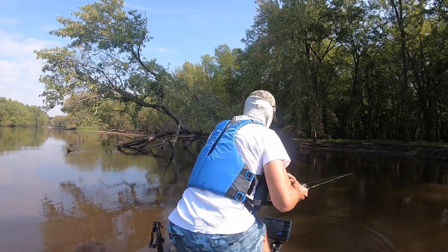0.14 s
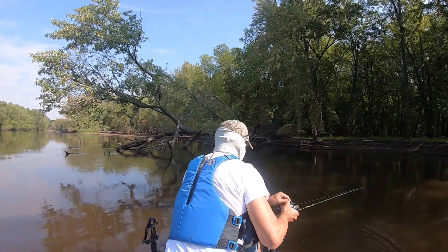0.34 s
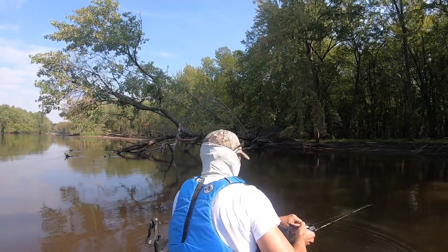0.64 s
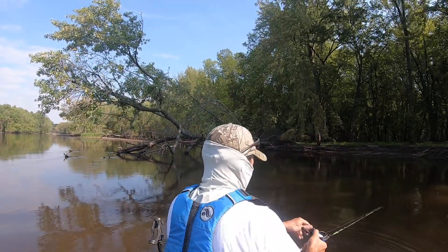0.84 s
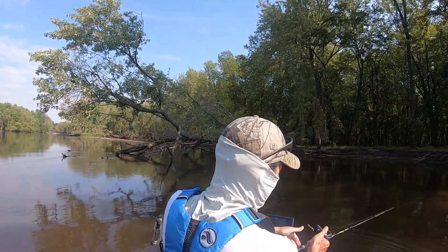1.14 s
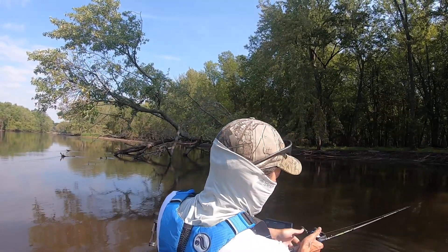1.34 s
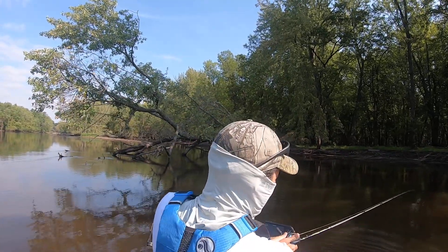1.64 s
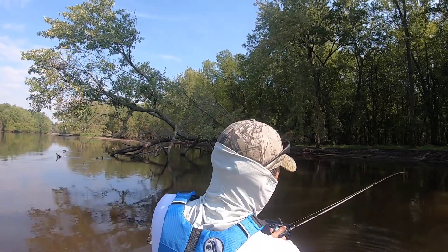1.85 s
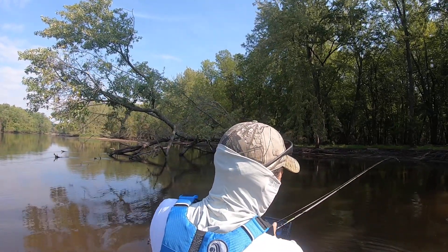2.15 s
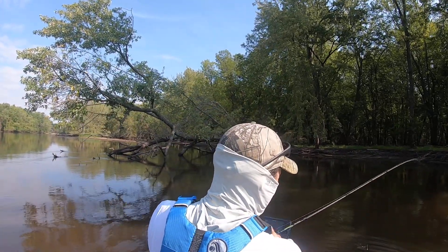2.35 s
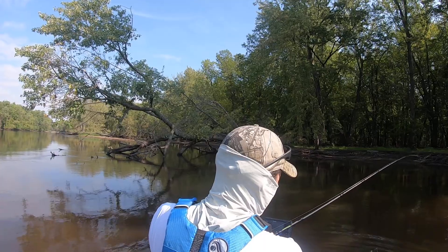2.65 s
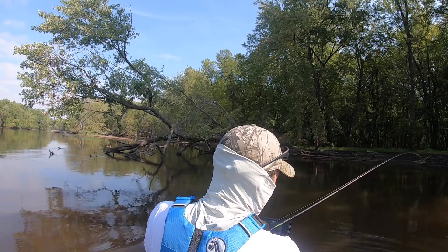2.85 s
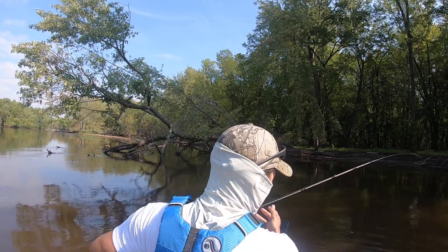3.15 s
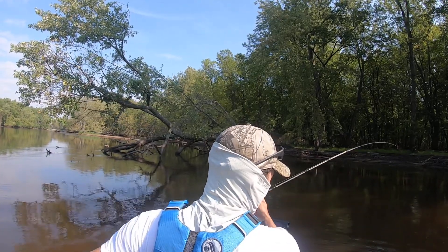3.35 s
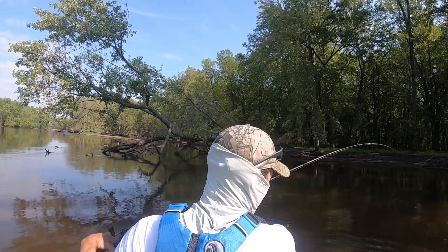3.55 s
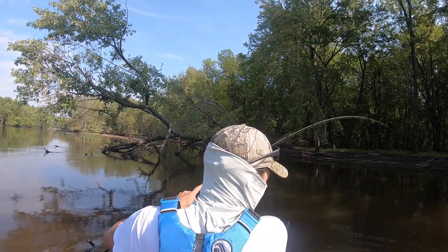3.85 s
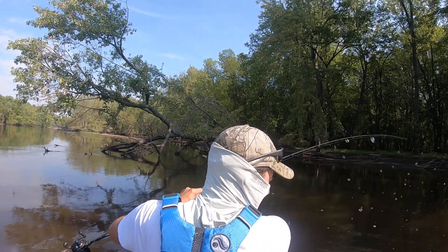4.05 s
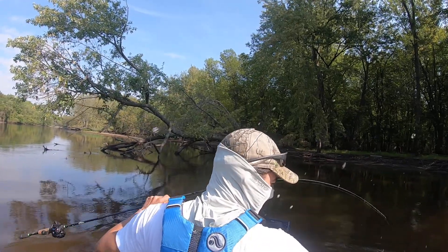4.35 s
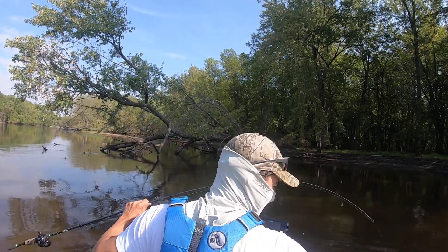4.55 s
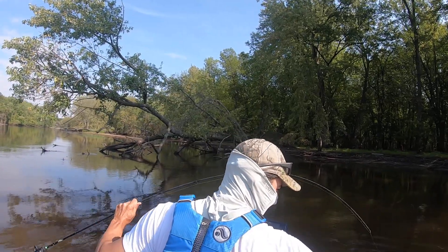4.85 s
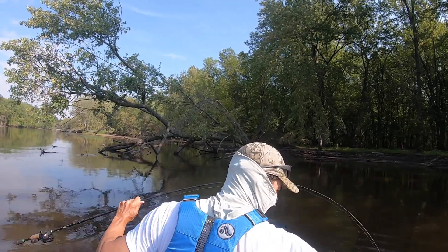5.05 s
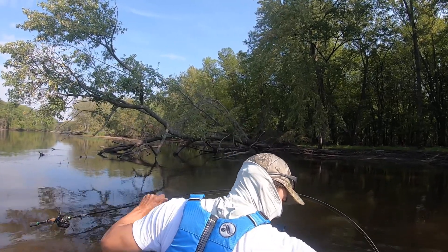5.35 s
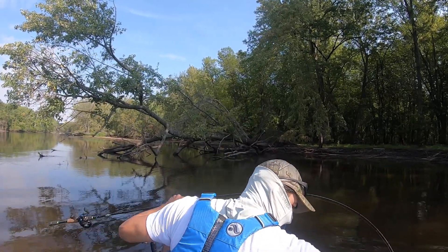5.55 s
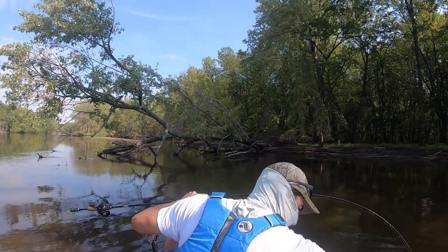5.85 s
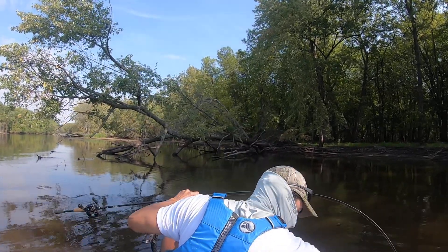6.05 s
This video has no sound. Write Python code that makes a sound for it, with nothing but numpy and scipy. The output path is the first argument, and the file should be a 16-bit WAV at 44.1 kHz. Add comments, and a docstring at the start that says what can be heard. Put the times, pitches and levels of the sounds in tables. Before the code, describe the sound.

Close, boat-mounted sound on a quiet river, with soft air and a faint steady band of insects. From 0 to 0.4 s clothing rustles and crackles with small dry clicks. From about 0.45 to 1.2 s the angler drops into the seat: crowded hollow knocks, low booms and plastic clacks, with rumbling hull and stretching mesh. More knocks come near 1.35 and a strong short one at 1.5 s. The stereo narrows; from 1.7 to 2.9 s line sings thin, high, fluttering, gliding notes, with weak bumps near 2.1 and 2.6 s. Sleeves swish around 3.3 s. At 3.6 to 4.1 s bright metal clinks and sharp clicks, loudest at 3.93 s, join the first watery plops. A fish slaps and thrashes until about 5.3 s, moving right, with gurgles, spray and drips. Foam hiss fades; soft thumps at 5.8 and 6 s end it.

```python
"""An angler and a hooked fish

An angler drops into the seat of a plastic kayak on a calm river: clothes rustle, the hull booms and knocks.
Blows ring decaying tones in the hull, and filtered random clicks make the cloth. Line sings off the reel in
fluttering notes, metal tackle clinks in close pairs of tones, and a fish slaps and thrashes on the right as
ringing air pockets and spray. Noise makes the air and insects; the stereo nearly closes in the quiet middle."""
import sys
import numpy as np
from scipy import signal
from scipy.fft import rfft, irfft
from scipy.io import wavfile
from scipy.ndimage import uniform_filter1d, map_coordinates

SR = 44100
rng = np.random.default_rng(int(sys.argv[2]) if len(sys.argv) > 2 else 0)


def to_wav(s):
    """Save 16-bit WAV."""
    ch = np.atleast_2d(s).T  # columns
    pcm = np.round(np.clip(ch, -1, 1) * 32767)  # PCM
    wavfile.write(sys.argv[1], SR, pcm.astype(np.int16))


N = 273420
TIME = np.arange(N) / SR
AGE = np.arange(SR // 2) / SR  # time since a blow, s

# soft, hollow thumps of body and water against the hull:
# t/s, boom level/dB, starting pitch f/Hz, time to fade by 60 dB/s, thud level relative to the boom/dB
THUMP_EVENTS = [(0.15, -29, 100, 0.71, 4), (0.208, -23, 214, 0.074, -1), (0.257, -32, 205, 0.19, 6),
                (0.453, -19, 149, 0.044, 2), (.613, -20, 727, 0.056, -18), (0.772, -20, 196, 0.12, -4),
                (0.812, -11, 172, 0.059, -27), (0.845, -14, 191, 0.107, -15),
                (0.961, -16, 142, 0.073, -15.5), (0.978, -13, 205, 0.092, -4.5),
                (1.335, -29, 260, 0.11, -13.5), (1.510, -9.5, 533, 0.041, -10.5),
                (1.515, -9, 100, 0.045, -11.5), (1.586, -28, 470, 0.087, -7),
                (2.082, -19.5, 197.7, 0.11, -9), (2.563, -32, 74, 0.12, -3),
                (3.004, -34.5, 177, 0.088, -6.5), (3.204, -30, 90, 0.13, -5), (3.313, -33.5, 115, 0.13, 7),
                (3.314, -39, 490, 0.059, 5), (3.458, -29, 275, 0.041, -18), (3.463, -37, 106, 0.12, -2),
                (3.521, -36, 77.8, 0.41, -3), (4.167, -33, 270, 0.034, 10), (4.22, -24.5, 181.8, 0.31, 2),
                (4.289, -29.5, 163.5, 0.26, 1), (4.452, -36.5, 133.7, 0.28, 9),
                (4.547, -34.5, 70, 0.23, -5), (4.88, -39.5, 68, 0.34, 6), (5.776, -26, 190, 0.06, -29),
                (5.798, -30.5, 101.2, 0.4, -28)]
# sheets of water thrown by the tail:
# t/s, relative spray level/dB, relative churning level/dB, length/s, relative falling water level/dB, flight/s
WATER_SHEETS = [(3.602, -42.5, -73, 0.075, -42, 0.14), (3.716, -38, -29, 0.043, -43, 0.071),
                (3.921, -62, -29.5, 0.021, -48.5, 0.12), (4.146, -33.5, -53, 0.075, -46, 0.21),
                (4.311, -44.5, -40.5, 0.071, -67, 0.072), (4.548, -43, -46, 0.14, -45, 0.14),
                (4.702, -40, -33, 0.071, -38.5, 0.13), (4.798, -39.5, -32.5, 0.088, -41, 0.17),
                (5.02, -41.5, -56, 0.076, -61, 0.052), (5.141, -38.5, -69, 0.052, -69, 0.059)]
# strokes of sleeves and life vest:
# t at the fastest/s, relative swish level/dB, relative crackle level/dB, rise by 20 dB/s, fall by 20 dB/s
CLOTH_STROKES = [(0.016, -65, -46, 0.062, 0.13), (0.163, -48.5, -47, 0.086, 0.15),
                 (.33, -43, -49, 0.14, 0.078), (.465, -45, -58, 0.11, 0.047), (.6, -41, -46.5, 0.24, 0.14),
                 (.76, -48.5, -56.5, 0.11, 0.33), (.87, -46, -78, 0.29, 0.31), (1.42, -60.5, -74, 1, 0.33),
                 (1.735, -49.5, -63, 0.46, 0.14), (2.0, -64, -103, 0.73, 1), (3.15, -60, -92, 0.41, 0.61),
                 (3.335, -48, -61, 0.19, 0.28)]


def gain_of(db):
    """Decibels to amplitude."""
    return 10 ** (np.asarray(db) / 20)


def evened(x):
    """Scales to an rms of 1."""
    return x / np.sqrt(np.mean(x ** 2) + 1e-20)


def peaked(x):
    """Scales to a peak of 1."""
    return x / (abs(x).max() + 1e-20)


def read(points, hz):
    """Reads a spectrum on a log-frequency axis."""
    f, value = np.transpose(points)
    return np.interp(np.log(hz + 1), np.log(f + 1), value)


def levels(rows):
    """One gain curve for each dB column, practically silent outside the rows."""
    s, *columns = np.transpose(rows)
    return [gain_of(np.interp(TIME, s, c, left=-120, right=-120)) for c in columns]


def add(mix, s, sound):
    """Mixes a sound in at its time."""
    part = mix[..., max(round(s * SR), 0):][..., :sound.shape[-1]]
    part += sound[..., :part.shape[-1]]


def colour(x, points):
    """Filters by a spectrum."""
    hz = np.fft.rfftfreq(x.shape[-1], 1 / SR)
    return irfft(rfft(x) * gain_of(read(points, hz)), x.shape[-1])


def band(x, hz, q):
    """A broad resonance that rings only after its input."""
    hz = min(hz, SR / 3)
    b, a = signal.iirpeak(hz, max(q, 3 * hz / SR), SR)
    return signal.lfilter(b, a, x)


def fade(t60):
    """A decay of 60 dB in t60 seconds, never faster than 1 ms."""
    return np.exp(-np.log(1000) * AGE / max(t60, 1e-3))


def wander(hz):
    """Slow random movement with an rms of 1."""
    smoothing = np.exp(-(np.fft.rfftfreq(N, 1 / SR) / hz) ** 2)
    return evened(irfft(rfft(rng.standard_normal(N)) * smoothing, N))


def grains(per_s, spread_db):
    """A random train of clicks of either sign; a spread other than 0 makes their sizes uneven."""
    present = rng.random(N) < per_s / SR
    sign = rng.choice([-1, 1], N)
    return present * sign * gain_of(spread_db * np.minimum(rng.exponential(1, N), 4))


def place(x, pan_db, lag_s_per_db=.000012):
    """The far ear hears a sound softer and later; pan_db is left minus right."""
    sides = gain_of([[pan_db / 2], [-pan_db / 2]])
    left = np.roll(x, round(-pan_db * lag_s_per_db * SR))  # earlier when the left is the near ear
    return np.array([left, x]) * sides / sides.mean()


def stroke(s, db, rise_s, fall_s):
    """A movement's gain: climbs 20 dB in rise_s to its peak, then drops 20 dB in fall_s."""
    before = (s - TIME) / max(rise_s, .005)
    after = (TIME - s) / max(fall_s, .005)
    return gain_of(db - 20 * np.minimum(np.maximum(before, after), 10))


def together(gains):
    """Unrelated sounds add in power."""
    return np.sqrt(sum(g ** 2 for g in gains))


def burst(t60, onset_s):
    """A gritty contact: noise that swells and dies."""
    return rng.standard_normal(len(AGE)) * fade(t60) * (1 - np.exp(-AGE / onset_s))


def snap(hz, t60, q, onset_s):
    """A short crack: a noise burst through two broad resonances at one pitch."""
    once = band(burst(t60, onset_s), hz, q)
    return peaked(band(once, hz, q / 2))


def bubble(hz, t60, rise, onset_s=0.00043):
    """A fading ring, as of an air pocket, whose pitch glides by rise octaves within t60."""
    pitch = hz * 2 ** (rise * np.minimum(AGE / max(t60, 1e-3), 1))
    ring = np.sin(2 * np.pi * np.cumsum(pitch) / SR)
    return peaked(ring * fade(t60) * (1 - np.exp(-AGE / onset_s)))


def patchy(x, depth_db):
    """Random patches of level, about 15 ms by 1 kHz."""
    z = signal.stft(x, nperseg=256)[2]
    field = uniform_filter1d(rng.standard_normal(z.shape[-2:]), size=6, axis=0)
    field = evened(uniform_filter1d(field, size=5, axis=1))
    return signal.istft(z * gain_of(depth_db * field), nperseg=256)[1][..., :N]


def twisted(x, side_db, turn_rad):
    """Vibration through the mount shakes the two microphones out of step."""
    side = gain_of(side_db) * (signal.hilbert(x) * np.exp(1j * turn_rad)).real
    return np.array([x - side, x + side])


def knocks(level_db=-2, boom_db=5, clack_db=7, tick_db=6, clunk_db=-2, slide_db=-6,
           scuff=0.099, sway=0.84, lead_s=0.001987):
    """Each blow scuffs briefly and rings the hull; heavy blows favour the low modes, hard ones the high."""
    # blows on seat and hull: t/s, then relative levels of body/dB, boom/dB, clack/dB, tick/dB,
    # and time for the scuff to fade by 60 dB/s
    blows = [(0.452, -36, -22.5, -68, -42, 0.0064), (0.557, -28, -34, -37, -43, 0.029),
             (0.600, -21, -36, -52, -46, 0.051), (0.610, -17, -18, -21, -25, 0.046),
             (0.626, -24, -20, -27.5, -46, 0.075), (0.697, -25.5, -23, -30.5, -37.5, 0.1),
             (0.721, -19.5, -21.5, -27.5, -45, 0.056), (0.803, -25, -24, -34, -49, 0.061),
             (0.825, -39, -30, -33.5, -50, 0.024), (0.841, -20, -21.5, -37, -40, 0.05),
             (0.875, -14.5, -22, -32, -40, 0.052), (0.904, -20, -36, -50, -55, 0.054),
             (0.948, -27, -37, -56, -60, 0.04), (0.991, -24, -48, -28.5, -36.5, 0.047),
             (1.037, -19, -23, -18.5, -32, 0.05), (1.146, -18.5, -35, -35, -55, 0.034),
             (1.154, -12.5, -24.5, -19.5, -27, 0.068), (1.173, -29.5, -41, -35, -57, 0.059),
             (1.351, -23, -31.5, -30, -40, 0.048), (1.381, -36, -34, -55, -56, 0.025),
             (1.410, -36, -27.5, -54.5, -62, 0.082), (1.481, -33, -18.5, -63, -60, 0.17),
             (1.511, -14.5, -38, -27.5, -46, 0.06), (1.521, -51.5, -23, -29.5, -58, 0.059),
             (1.994, -33.5, -78, -75, -72, 0.076), (2.081, -51, -56, -59, -67, 0.019),
             (2.556, -39, -38.5, -65, -57, 0.056), (3.309, -33.5, -31, -45, -59, 0.086),
             (3.458, -38, -51, -82, -73, 0.054), (6.004, -40.5, -37.5, -53, -46, 0.07)]
    # modes of the hull: nominal f/Hz, relative level/dB, time to fade by 60 dB/s
    hull_modes = [(93.6, -7.5, 0.59), (134.3, -1, 0.076), (205, -17, 0.084), (306, -14, 0.035),
                  (446, -7.5, 0.076), (548, -7.5, 0.15), (635, -21.5, 0.047), (750, -19, 0.042),
                  (1382, -8, 0.024), (1534, -7, 0.016), (1520, -10, 0.04), (2170, -20.5, 0.012),
                  (2600, -8.5, 0.0045), (3390, -39, 0.0091)]
    out = np.zeros((2, N))
    for s, body, boom, clack, tick, scuff_t60 in blows:
        # the scuff leads the blow
        contact = np.roll(AGE == 0, round(lead_s * SR)) + scuff * burst(scuff_t60, onset_s=0.00011)
        weight = [(200, boom + boom_db), (430, body), (630, body), (1100, clack + clack_db)]  # (Hz, dB)
        for hz, db, t60 in hull_modes:
            mode = np.exp(2j * np.pi * hz * rng.uniform(0.93, 1.04) * AGE) * fade(t60)
            ring = peaked(signal.fftconvolve(contact, mode)[:len(AGE)])
            ring = gain_of(level_db + db + read(weight, hz)) * ring
            side = sway * ring.real  # the ringing twists the mount
            add(out, s, np.array([ring.imag + side, ring.imag - side]))
        clunk = snap(hz=470, t60=scuff_t60, q=2.3, onset_s=0.0021)  # loose parts
        add(out, s, gain_of(body + clunk_db) * clunk)
        add(out, s, gain_of(tick + tick_db) * snap(hz=3760, t60=0.018, q=0.99, onset_s=0.0012))
        # plastic slides before it seats: a crack played backwards, ending at the blow
        slide = snap(hz=1500, t60=0.021, q=0.88, onset_s=0.00024)[:SR // 10][::-1]
        add(out, s + lead_s - len(slide) / SR, gain_of(clack + slide_db) * slide)
    return out


def thumps(level_db=0, sag_octaves=-0.42, thud_hz=260, thud_t60=0.16):
    """The hollow hull booms together with a dull thud, sinking a little in pitch."""
    out = np.zeros(N)
    b, a = signal.butter(2, thud_hz, fs=SR)
    for s, db, hz, t60, thud_db in THUMP_EVENTS:
        thud = peaked(signal.lfilter(b, a, burst(thud_t60, onset_s=0.00011)))
        boom = bubble(hz, t60, sag_octaves, onset_s=0.0015)
        add(out, s, gain_of(db + level_db) * (boom + gain_of(thud_db) * thud))
    return twisted(out, side_db=-2, turn_rad=1.0)


def rocking(level_db=1, lumpy_db=4, side_db=-1, settle_db=-15.5, settle_rise_s=0.016, settle_fall_s=0.14):
    """Lumpy rumble of the hull: it follows the shifting weight and swells round each thump."""
    # the angler's shifting weight keeps the hull rocking: t/s, relative rumble level/dB
    weight_shifts = [(0.0, -37), (0.47, -38), (.66, -30.5), (0.81, -25), (0.88, -22), (1.15, -34),
                     (1.27, -40.5), (1.6, -40), (1.83, -44.5), (2.25, -48), (2.7, -52), (2.93, -54),
                     (3.02, -43.5), (3.37, -46), (3.71, -49.5), (4.03, -40), (4.35, -56.5), (4.9, -53.5),
                     (5.22, -76), (5.7, -66), (5.96, -49.5), (6.2, -59)]
    # spectrum of the rumble: f/Hz, relative level/dB
    rumble_spectrum = [(13, -50), (22, 6), (81, 4.5), (135, 0), (179, 0.5), (206, 2), (248, -3.5),
                       (401, -17.5), (548, -19.5), (660, -21.5), (900, -32), (1170, -50), (1980, -120)]

    def rumble():
        noise = colour(rng.standard_normal(N), rumble_spectrum)
        return evened(noise * gain_of(lumpy_db * wander(hz=20.2)))

    mid = rumble()
    side = gain_of(side_db) * rumble()
    shifting = gain_of(level_db) * levels(weight_shifts)[0]
    settling = [stroke(s, db + settle_db, settle_rise_s, settle_fall_s) for s, db, *_ in THUMP_EVENTS]
    return together([shifting, *settling]) * np.array([mid + side, mid - side])


def clothes(swish_db=3.5, crackle_db=-3, seat_db=0, patchy_db=2.5, width=0.17):
    """Fabric slides with a soft swish while its folds crackle; each band catches and slips by itself."""
    # spectrum of the swish: f/Hz, relative level/dB
    cloth_spectrum = [(240, -18), (400, -3.5), (840, -7.5), (1260, -3), (2590, -4), (3290, -3),
                      (4490, -9.5), (6210, -35.5), (7000, -16.5), (9100, -43), (15400, -120)]
    # spectrum of the crackle: f/Hz, relative level/dB
    crackle_spectrum = [(3000, -10.5), (5000, 3.5), (6300, -7), (8800, 2), (10600, -11.5), (12800, -5.5),
                        (15500, -9)]
    # the mesh seat stretches under the angler's weight:
    # t at the fastest/s, level/dB, rise by 20 dB/s, fall by 20 dB/s
    seat_strokes = [(.31, -56, .1, .2), (.49, -51.5, 0.074, 0.39), (.75, -51, .1, 0.23),
                    (.87, -49.5, 0.33, 0.044)]
    # spectrum of the stretching mesh: f/Hz, relative level/dB
    mesh_spectrum = [(4000, -22), (8000, -34), (11500, 7), (14500, 3), (16000, 0)]

    def rub(spectrum, per_s, spread_db):
        mid, side = (evened(colour(grains(per_s, spread_db), spectrum)) for _ in range(2))
        return patchy(np.array([mid + width * side, mid - width * side]), patchy_db)

    swish = together(stroke(s, db, rise, fall) for s, db, _, rise, fall in CLOTH_STROKES)
    crackle = together(stroke(s, db, rise, fall) for s, _, db, rise, fall in CLOTH_STROKES)
    stretch = together(stroke(*row) for row in seat_strokes)
    sleeves = gain_of(swish_db) * swish * rub(cloth_spectrum, per_s=2600, spread_db=0.0)
    vest = gain_of(crackle_db) * crackle * rub(crackle_spectrum, per_s=1600, spread_db=-0.5)
    seat = gain_of(seat_db) * stretch * rub(mesh_spectrum, per_s=1200, spread_db=4.5)
    return sleeves + vest + seat


def creases(level_db=1, t60=0.019, q=4.2, width=0.55, count=16):
    """Stiff folds of the vest let go at random moments in tiny snaps, each group at its own pitch."""
    out = np.zeros((2, N))
    for hz in np.geomspace(1800, 10000, count):
        train = grains(per_s=9, spread_db=2.5)
        sides = 1 + width * rng.uniform(-1.8, 1) * np.array([[1], [-1]])
        fold = snap(hz, t60, q, onset_s=0.0001)[:SR // 20]
        out += sides * evened(signal.oaconvolve(train, fold)[:N])
    movement = together(stroke(s, db, rise, fall) for s, _, db, rise, fall in CLOTH_STROKES)
    return gain_of(level_db) * movement * evened(out)


def plops(level_db=0, smack_db=0, q=1.0):
    """The fish smacks the surface in short cracks and traps large air pockets that ring."""
    # slaps and large air pockets ringing in the water:
    # t/s, relative peak/dB, starting pitch f/Hz, time to fade by 60 dB/s, pitch rise in that time/octaves
    air_pockets = [(3.52, -40.5, 1080, 0.089, 0.6), (3.694, -15, 1040, 0.012, 2.5),
                   (3.699, -19, 677, 0.077, 0.9), (3.727, -11.5, 704, 0.013, -0.7),
                   (3.728, -12, 1570, 0.014, -0.3), (3.741, -4.5, 2170, 0.0073, 0.7),
                   (3.756, -28.5, 410, 0.11, 0.2), (3.785, -22, 358, 0.035, 0),
                   (3.805, -22, 637, 0.03, -0.6), (3.9288, -20, 440, 0.008, -0.8),
                   (3.9997, -27.5, 1790, 0.019, 0.25), (4.058, -32.5, 1444, 0.066, 0.7),
                   (4.391, -27.5, 416, 0.045, -0.5), (4.417, -21.5, 720, 0.038, 0.32),
                   (4.612, -24.5, 1730, 0.057, -1.1), (4.628, -22.5, 1350, 0.045, -0.1),
                   (4.636, -24.5, 1420, 0.018, 0.2), (4.630, -29, 902, 0.075, -0.3),
                   (4.719, -27, 627, 0.14, 2.5), (4.75, -24, 342, 0.03, -0.2), (4.847, -17, 1270, 0.048, 1),
                   (4.925, -30.5, 396.5, 0.19, 1), (4.953, -15, 1710, 0.012, 0.5),
                   (4.995, -27.5, 600, 0.054, 0.5), (5.011, -35.5, 348.5, 0.17, 0),
                   (5.107, -34, 573, 0.1, 4.5), (5.244, -43.5, 863, 0.13, -0.3),
                   (5.297, -24, 3090, 0.017, -0.1), (6.182, -43.5, 1059, 0.059, -0.1)]
    # flat smacks and single drops: t/s, relative peak/dB, pitch f/Hz, time for the noise to fade by 60 dB/s
    flat_smacks = [(3.695, -13.5, 2420, 0.023), (4.166, -22, 3000, 0.022), (4.176, -22, 2350, 0.013),
                   (4.186, -14, 2696, 0.016), (4.329, -26, 6440, 0.016), (4.48, -23.5, 7060, 0.0063),
                   (4.597, -15.5, 8600, 0.061), (4.670, -24, 6500, 0.013), (4.738, -18.5, 2000, 0.016),
                   (4.828, -18, 2500, 0.018), (4.85, -23, 1800, 0.008), (4.861, -17, 1890, 0.008),
                   (4.934, -21, 6760, 0.0089), (4.952, -15.5, 2700, 0.006), (5.058, -28, 3220, 0.015),
                   (5.178, -18.5, 4000, 0.024), (5.298, -24.5, 5130, 0.011)]
    out = np.zeros(N)
    for s, db, hz, t60, rise in air_pockets:
        add(out, s, gain_of(db + level_db) * bubble(hz, t60, rise, onset_s=0.013 * t60))
    for s, db, hz, t60 in flat_smacks:
        add(out, s, gain_of(db + smack_db) * snap(hz, t60, q, onset_s=0.000083))
    return out


def thrown_water(fall_spray_db=-4.5, fall_churn_db=2.5, bunching=2.73):
    """Levels of spray and churning: each sheet swells, then falls back bunched round its flight time."""
    spray, churn = [], []
    for s, sheet_db, stir_db, length, fall_db, flight in WATER_SHEETS:
        age = np.maximum(TIME - s, 0)
        sheet = np.sin(np.pi * np.minimum(age / length, 1)) ** 2
        falling = gain_of(fall_db) * (age / flight * np.exp(1 - age / flight)) ** bunching
        spray += [gain_of(sheet_db) * sheet, gain_of(fall_spray_db) * falling]
        churn += [gain_of(stir_db) * sheet, gain_of(fall_churn_db) * falling]
    return together(spray), together(churn)


def splashing(spray_db=5.0, churn_db=2, clump_db=4.0, patchy_db=2, cycles=18, tilt_db=-1, gurgle_db=2,
              count=60):
    """Falling droplets fizz over a swarm of small bubbles that come in gurgling clumps."""
    # spectrum of the spray: f/Hz, relative level/dB
    spray_spectrum = [(500, -20), (1200, -6.5), (2800, -5.5), (4200, -12), (7500, -3), (10000, -12),
                      (12000, -17.5), (14500, -18), (16000, -45)]
    spray, churn = thrown_water()
    fizz = patchy(colour(grains(per_s=6000, spread_db=4.5), spray_spectrum), patchy_db)
    droplets = evened(fizz * gain_of(clump_db * wander(hz=70)))
    swarm = np.zeros(N)
    for hz in np.geomspace(480, 3400, count):
        ring = bubble(hz, cycles / hz, rng.uniform(0, 0.35))[:SR // 10]
        train = grains(per_s=hz / 130, spread_db=3)  # small bubbles are more numerous
        swarm += gain_of(tilt_db * np.log2(hz)) * evened(signal.oaconvolve(train, ring)[:N])
    gurgling = evened(swarm * gain_of(gurgle_db * wander(hz=29.5)))
    return gain_of(spray_db) * spray * droplets + gain_of(churn_db) * churn * gurgling


def drips(level_db=-5.0, cycles=36, rise_octaves=0.5, tilt_db=-3.5, count=40):
    """Single drops stand out of the spray in brief rising pings at many pitches."""
    pings = np.zeros(N)
    for hz in np.geomspace(700, 9500, count):
        ring = bubble(hz, cycles / hz, rise_octaves)[:SR // 10]
        train = grains(per_s=5, spread_db=2.5)
        pings += gain_of(tilt_db * np.log2(hz)) * evened(signal.oaconvolve(train, ring)[:N])
    return gain_of(level_db) * thrown_water()[0] * evened(pings)


def pops(level_db=-2, cycles=9, count=16):
    """Fat drops strike the surface, each a crisp pop a few cycles long."""
    out = np.zeros(N)
    for hz in np.geomspace(1100, 4000, count):
        train = grains(per_s=7, spread_db=2)
        pop = bubble(hz, cycles / hz, 0, onset_s=1 / SR)[:SR // 20]
        out += evened(signal.oaconvolve(train, pop)[:N])
    return gain_of(level_db) * together(thrown_water()) * evened(out) / 2


def foam(level_db=-0.5, rise_s=0.13, fall_s=0.84):
    """Where water has fallen, foam hisses and slowly dies; its level is relative to the falling water."""
    # spectrum of the hiss: f/Hz, relative level/dB
    foam_spectrum = [(300, -15), (700, -8), (1400, -7.5), (2800, -5), (4200, -12.5), (7500, -5.5),
                     (10000, -14), (16000, -39)]
    level = together(stroke(s + flight, fall_db + level_db, rise_s, fall_s)
                     for s, *_, fall_db, flight in WATER_SHEETS)
    return level * evened(colour(grains(per_s=2200, spread_db=1.0), foam_spectrum))


def alongside(x, scatter=0.59, lag_s=.00013):
    """As the fish comes round to the right, the left ear falls into shadow and hears it later."""
    # the fish comes round the boat: t/s, bearing from 0 ahead to 1 on the right
    fish_bearing = [(3.7, 0.43), (4.2, 0.45), (4.6, 0.65)]
    # what the far ear hears of a sound right at the side: f/Hz, level/dB
    shadow_spectrum = [(100, -2.5), (400, -1), (700, -13), (1300, -65), (2400, -40), (4400, -20),
                       (8000, -22), (15000, 5)]
    bearing = np.clip(np.interp(TIME, *np.transpose(fish_bearing)), 0, 1)
    shaded = (1 - bearing) * x + bearing * colour(x, shadow_spectrum)
    lag = lag_s * bearing * (1 + scatter * wander(hz=90))  # drops land all round the fish
    left = map_coordinates(shaded, [(TIME - lag) * SR], order=3)
    return np.array([left, x])


def line(level_db=-5.0, flutter=0.56, halo_db=-3, halo_hz=190, halo_below_hz=130):
    """The running line sings thin, fluttering, gliding notes, with an airy skirt just below them."""
    # line running off the spool, one table a run: t/s, pitch f/Hz, relative level/dB
    line_runs = [
        [(1.67, 4520, -60), (1.74, 4590, -55), (1.85, 4520, -55)],
        [(1.83, 3950, -55), (1.865, 3660, -57), (1.91, 3570, -59), (1.96, 3660, -57), (2.0, 3760, -57),
         (2.21, 4230, -51), (2.38, 4510, -50), (2.45, 4530, -54), (2.6, 4420, -71)],
        [(2.11, 4380, -63), (2.15, 4720, -57), (2.19, 4500, -62)],
        [(2.54, 4040, -63), (2.76, 4310, -60.5), (2.9, 4350, -70)],
    ]
    out = np.zeros(N)
    for rows in line_runs:
        s, hz, db = np.transpose(rows)
        turn = 2 * np.pi * np.cumsum(np.interp(TIME, s, hz)) / SR
        note = evened((1 + flutter * wander(hz=30)) * np.sin(turn))
        below = turn - 2 * np.pi * halo_below_hz * TIME
        skirt = evened(wander(halo_hz) * np.sin(below) + wander(halo_hz) * np.cos(below))
        out += levels(np.c_[s, db])[0] * evened(note + gain_of(halo_db) * skirt)
    return gain_of(level_db) * out


def clinks(level_db=-6, strike_db=-12, strike_t60=0.029, chatter=0.38, chatter_s=0.0051,
           bend=0.021, bend_s=0.057):
    """A small loose piece of metal rings in close pairs of modes, bending upwards and chattering on its seat."""
    # small metal tackle: t/s, relative level/dB, starting pitch f/Hz, overtones' relative level/dB
    clink_events = [(1.158, -48, 6800, -14), (1.307, -38.5, 6740, -21), (1.513, -47, 6870, -13),
                    (3.616, -36, 6730, 7), (3.638, -14, 6750, -4), (3.899, -30, 6650, -4),
                    (3.933, -15.5, 6760, 2), (4.033, -26.5, 6700, -8), (4.082, -14.5, 6800, -9)]
    # modes of the tackle: multiple of the pitch, relative level/dB, time to fade by 60 dB/s
    metal_modes = [(1, -1.5, 0.2), (1.007, -16, 0.14), (1.462, 2, 0.072), (1.476, -4.5, 0.17),
                   (1.775, -12.5, .06), (1.975, -8.5, 0.062), (2.04, -7, 0.16)]
    # how each mode reaches the two microphones: f/Hz, left-right/dB, left leads/rad
    microphone_offsets = [(6800, -12, -2.5), (9800, 0, 1.28)]
    out = np.zeros((2, N))
    clock = np.cumsum(1 + bend * (1 - np.exp(-AGE / bend_s))) / SR  # runs ahead, so the pitch climbs
    ear_hz, ear_db, ear_rad = np.transpose(microphone_offsets)
    for s, db, hz, overtones_db in clink_events:
        shake = rng.standard_normal((len(metal_modes), len(AGE)))
        shake = evened(uniform_filter1d(shake, size=int(chatter_s * SR) + 1))
        ring = np.zeros((2, len(AGE)))
        for (k, mode_db, t60), jolt in zip(metal_modes, shake):
            sides = gain_of([[np.interp(hz * k, ear_hz, ear_db)], [0]])
            lead = np.array([[np.interp(hz * k, ear_hz, ear_rad)], [0]])
            turn = 2 * np.pi * (hz * k * clock + rng.random()) + lead
            strength = gain_of(mode_db + overtones_db * min(2 * (k - 1), 1))
            rattle = 1 + chatter * k * jolt
            ring += sides / sides.mean() * strength * rattle * np.sin(turn) * fade(t60)
        ring *= 1 - np.exp(-AGE / 0.00042)  # soft onset
        strike = snap(hz=6500, t60=strike_t60, q=0.28, onset_s=0.0023)
        add(out, s, gain_of(db + level_db) * (ring + gain_of(strike_db) * strike))
    return out


def snaps(level_db=-3.5, q=1.4):
    """Rod, reel and buckles click: short noise bursts in broad resonances."""
    # dry clicks: t/s, relative peak/dB, pitch f/Hz, time for the noise to fade by 60 dB/s, left-right/dB
    click_events = [(0.15, -27, 4300, 0.009, -1), (0.169, -25.5, 3000, 0.018, 1),
                    (0.182, -20.5, 6400, 0.016, -9), (0.2747, -19, 7760, 0.013, 0),
                    (0.277, -16, 3200, 0.03, -1), (0.319, -23, 7660, 0.057, 1),
                    (.353, -18.5, 5500, 0.0078, 3), (0.483, -29.5, 8050, 0.012, -1.5),
                    (0.614, -24, 3460, 0.035, 5), (0.652, -22, 2900, 0.014, 3),
                    (0.742, -23, 3000, 0.02, -3), (0.78, -22.5, 2780, 0.082, -2.5),
                    (0.961, -14, 2130, 0.048, -5.5), (1.156, -17, 2830, 0.014, -14),
                    (2.079, -27.5, 2060, 0.016, 9.5), (2.811, -40, 2350, 0.027, 3),
                    (3.7966, -11, 6800, 0.014, -5), (3.798, -18, 10000, 0.015, -0.5),
                    (3.9284, -9, 6880, 0.0043, -3.5), (3.9305, -10, 4990, 0.011, -13),
                    (3.933, -6, 4270, 0.014, -1), (3.9352, -8, 9950, 0.0099, -1),
                    (4.061, -26, 7240, 0.025, -3), (4.29, -21.5, 2600, 0.016, 10),
                    (5.987, -31.5, 2280, 0.071, -10), (6.008, -35.5, 990, 0.044, -7)]
    out = np.zeros((2, N))
    for s, db, hz, t60, pan in click_events:
        click = gain_of(db + level_db) * snap(hz, t60, q, onset_s=0.00017)
        add(out, s, place(click, pan))
    return out


def deck(x, wet_db=-13, t60=0.13, top_hz=4500):
    """Deck, gear and water scatter a short, dull echo."""
    b, a = signal.butter(1, top_hz, fs=SR)
    tails = signal.lfilter(b, a, [burst(t60, onset_s=0.00028) for _ in range(2)])
    echo = signal.oaconvolve(x, tails / np.linalg.norm(tails[0]), axes=1)[:, :N]
    return x + gain_of(wet_db) * echo


def riverbank(air_db=-60.5, insects_db=-66, insects_pan_db=-23, width=0.78):
    """Quiet air and a steady band of insects, both filtered noise."""
    # spectrum of the air: f/Hz, relative level/dB
    air_spectrum = [(18, -33.5), (30, -34), (64, -30), (108, -31), (156, 7.5), (243, -6), (359, -5.5),
                    (561, -27.5), (728, -7.5), (1050, -16.5), (4190, -23), (5170, -5.5), (6370, -28),
                    (9940, -22.5), (15500, -26)]
    # spectrum of the insects in the trees: f/Hz, relative level/dB
    insect_spectrum = [(3500, -25), (4700, -28), (5300, 2.5), (5700, -2), (6200, -23), (7000, -66)]
    mid, side = (evened(colour(rng.standard_normal(N), air_spectrum)) for _ in range(2))
    air = np.array([mid + width * side, mid - width * side])
    sides = gain_of([[insects_pan_db / 2], [-insects_pan_db / 2]])
    insects = sides * colour(rng.standard_normal((2, N)), insect_spectrum)
    return gain_of(air_db) * air + gain_of(insects_db) * evened(insects)


def narrowed(x, split_hz=9300):
    """Sets the stereo width; the part below the split closes first and opens last."""
    # the stereo image closes nearly to mono and opens again:
    # t/s, width below the split as a level/dB, width above it as a level/dB
    width_curve = [(.3, 4.5, 15), (.45, -9.5, 8), (.75, -19.5, -4), (1.15, -27.5, -21), (1.55, -63, -21),
                   (3.28, -52.5, -19), (3.42, -11, 2), (3.7, -8.5, 3), (3.952, 2, -1.5)]
    mid, side = x.mean(0), (x[0] - x[1]) / 2
    low = signal.sosfiltfilt(signal.butter(2, split_hz, fs=SR, output="sos"), side)
    s, low_db, high_db = np.transpose(width_curve)
    low_gain = gain_of(np.interp(TIME, s, low_db))
    high_gain = gain_of(np.interp(TIME, s, high_db))
    side = low_gain * low + high_gain * (side - low)
    return np.array([mid + side, mid - side])


def scene():
    """Boat, angler, tackle and fish in the open air."""
    # the angler leans out to the right: t/s, left-right/dB
    boat_lean = [(4.6, 0.5), (5.9, -4.5)]
    lean_db = np.interp(TIME, *np.transpose(boat_lean))
    boat = (knocks() + thumps() + rocking()) * gain_of([lean_db / 2, -lean_db / 2])
    tackle = snaps() + clinks() + line()
    fish = alongside(plops() + splashing() + drips() + pops() + foam())
    return boat + clothes() + creases() + deck(tackle + fish) + riverbank()


def record(dry, edge_hz=15900):
    """Stereo width, the microphone's soft top end, then the band limit."""
    # response of the microphone: f/Hz, level/dB
    microphone_response = [(10, -26), (30, -3), (60, 0.5), (9500, -5), (11500, -9.5), (16000, -16)]
    heard = colour(narrowed(dry), microphone_response)
    lowpass = signal.firwin(511, edge_hz, window=("kaiser", 9), fs=SR)
    return signal.oaconvolve(heard, lowpass[None], "same")


dry = scene()
out = record(dry)
to_wav(out)
```